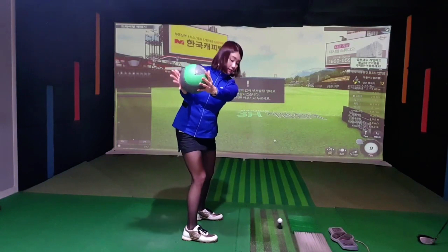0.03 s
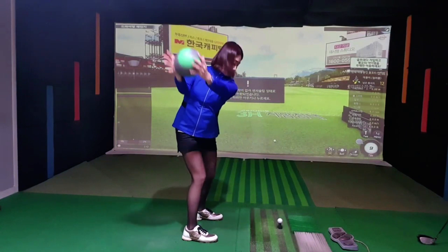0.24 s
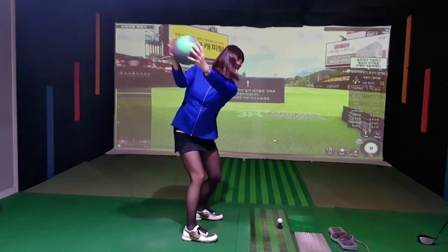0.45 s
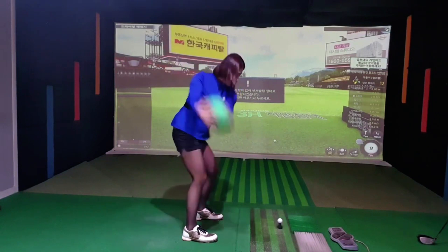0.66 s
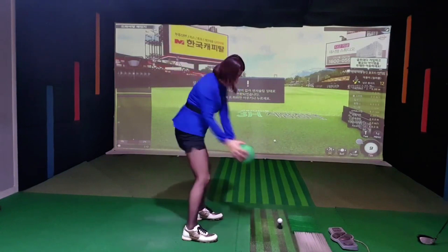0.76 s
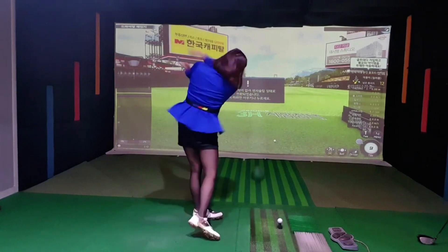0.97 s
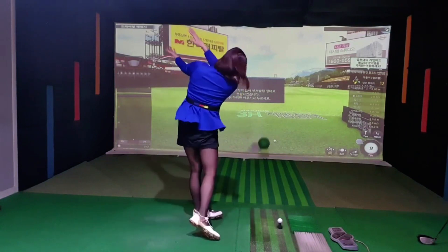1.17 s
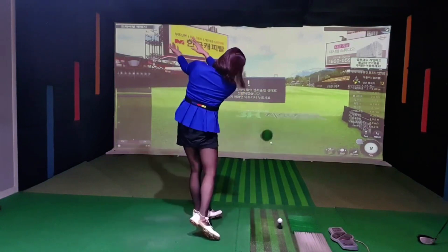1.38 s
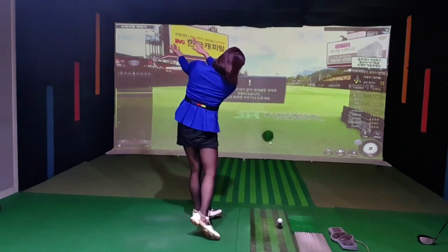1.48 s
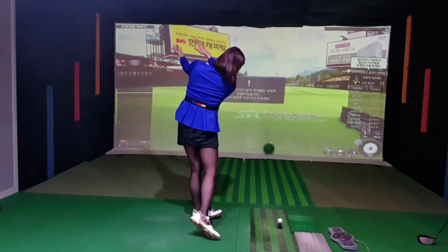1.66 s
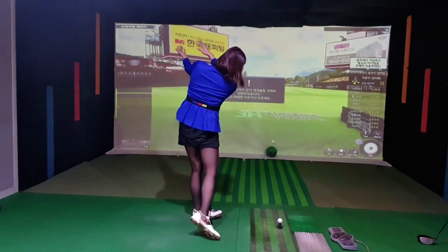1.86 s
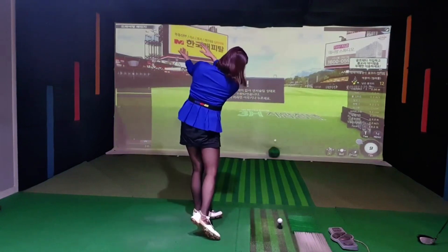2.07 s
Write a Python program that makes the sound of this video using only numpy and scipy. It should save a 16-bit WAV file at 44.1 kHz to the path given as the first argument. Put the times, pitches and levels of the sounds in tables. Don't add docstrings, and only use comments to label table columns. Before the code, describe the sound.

A rubber ball thumps hard on hollow turf flooring, then knocks and scrapes a hanging cloth screen

```python
import sys
import numpy as np
from scipy import signal
from scipy.fft import rfft, irfft, next_fast_len
from scipy.io import wavfile
from scipy.ndimage import uniform_filter1d, map_coordinates

SR = 44100
rng = np.random.default_rng(int(sys.argv[2]) if len(sys.argv) > 2 else 0)


def pcm_store(signal):
    levels = np.round(np.clip(np.atleast_2d(signal), -1, 1) * 32767)
    wavfile.write(sys.argv[1], SR, levels.astype(np.int16).T)


def convert_level_to_amplitude(level_db):
    exponent = np.asarray(level_db, float) / 20
    return 10 ** exponent


N = 93844
THUMP_S, BOARDS_S, REBOUND_S = 1.108, 1.116, 1.215
SWAY_S, SCREEN_S, LAND_S = 1.3, 1.401, 1.853
PAIR = np.array([[1], [-1]])

# [f/Hz, correlation]
LIKENESS = [(60, 0.99), (130, 0.97), (290, 0.96), (640, 0.64), (1400, 0.32), (3100, -0.027), (15000, -0.11)]
# [f/Hz, level/dB per Hz]
HISS_COLOUR = [(2000, -16), (4000, 1), (7000, 1.5), (9500, 4), (10500, -4), (15700, -5.5)]
# [f/Hz, level/dB per Hz]
VENT_COLOUR = [(25, -14.5), (60, -3), (150, -7), (230, -0.5), (450, -8), (1100, -16.5), (2700, -26),
               (3200, -34)]
# [t/s, level/dB]
JACKET_EFFORT = [
    (.4, -72),
    (.65, -76),
    (.8, -64.5),
    (.915, -52),
    (.98, -57),
    (1.02, -56),
    (1.1, -62.5),
    (1.26, -62.5),
    (1.4, -72),
]
# [f/Hz, level/dB per Hz]
NYLON_COLOUR = [(1200, -9.5), (2500, -1.5), (4500, -3), (6700, -7.5), (9500, -5.5), (15600, -7.5)]
# [f/Hz, level/dB per Hz]
ARMS_COLOUR = [(30, -6), (100, 4), (300, -10), (540, 1.5), (750, -17), (2000, -22)]
# [f/Hz, level/dB per Hz]
SLAP_COLOUR = [(60, -4.5), (200, -1.5), (450, -6), (900, -15), (1300, -19.5), (2400, -15), (4500, -26),
               (15600, -39.5)]
# [f/Hz, rise/s]
SLAP_RISE_S = [(100, 0.039), (500, 0.014), (1500, 0.0062), (15000, 0.0044)]
# [f/Hz, hold/s]
SLAP_HOLD = [(200, 0.054), (2500, 0.028), (5000, 0.02), (15000, 0.014)]
# [f/Hz, t60/s]
SLAP_TAIL = [(100, 0.74), (300, 0.37), (1000, 0.38), (3000, 0.23), (8000, 0.2), (15000, 0.29)]
# [f/Hz, level/dB, rise/s, t60/s]
BALL_MODES = [(1135, -39, 0.016, .12), (1336, -43, 0.018, 0.19), (1840, -39, 0.011, 0.12),
              (1946, -63, .015, .12), (2446, -40, 0.028, .12), (2960, -42, 0.036, 0.085),
              (4190, -46, 0.01, .12)]
# [f/Hz, level/dB, rise/s, t60/s]
PLATFORM_MODES = [(44.7, -22, 0.045, 0.43), (87.5, -15, 0.057, 0.091), (137.7, -22.5, 0.039, 0.21),
                  (198.6, -18, .03, 0.112), (223.6, -22.5, 0.059, 0.18), (263.6, -22.5, 0.041, 0.18),
                  (325, -28.5, 0.027, 0.25), (380.7, -27, 0.0474, 0.24), (454, -37, .02, 0.15),
                  (565, -34.5, 0.026, 0.18), (724, -36, .02, 0.28), (861, -40.5, 0.022, 0.28)]
# [f/Hz, level/dB, rise/s, t60/s]
REBOUND_MODES = [(43.1, -30, 0.047, 0.62), (72.3, -24.5, 0.029, 0.24), (158.7, -32, 0.02, 0.23),
                 (203.5, -32, 0.034, 0.32), (274, -34, 0.026, 0.18)]
# [f/Hz, level/dB, rise/s, t60/s]
SWAY_MODES = [(79, -40.5, 0.033, 0.21), (234, -42.5, 0.05, 0.26), (319, -44, 0.044, .15)]
# [f/Hz, level/dB, rise/s, t60/s]
FRAME_MODES = [(210.5, -29.5, .008, 0.1), (232, -29, 0.011, 0.11), (294, -35.5, .006, 0.048),
               (515, -35.5, .008, 0.051), (739, -40, 0.0069, 0.032), (1244, -40, 0.0019, 0.025)]
# [f/Hz, level/dB, rise/s, t60/s]
SHEET_MODES = [(41.4, -32, 0.027, 0.68)]
# [f/Hz, level/dB per Hz]
TAP_COLOUR = [(300, -10), (600, -1), (1300, -3), (2300, -8), (3500, -14), (6000, -36)]
# [f/Hz, level/dB per Hz]
BELLY_COLOUR = [(15, -31), (25, -6), (59, 0.5), (102, -2.5), (135, -16.5), (194, -6.5), (600, -21),
                (780, -46), (1320, -120)]
# [t/s, level/dB]
SCRAPE_EFFORT = [
    (1.402, -51.5),
    (1.42, -40),
    (1.445, -38),
    (1.485, -39.5),
    (1.51, -45),
    (1.54, -43.5),
    (1.6, -48.5),
    (1.66, -61),
]
# [f/Hz, level/dB per Hz]
CLOTH_COLOUR = [(290, -40), (500, -2), (1100, -11), (2200, -6), (4500, -7.5), (8000, -16.5), (12000, -16),
                (15600, -18.5)]
# [t/s, level/dB]
SLIDE_EFFORT = [
    (1.62, -54.5),
    (1.706, -56),
    (1.718, -51),
    (1.87, -47),
    (1.884, -52),
    (2.0, -66.5),
]
# [f/Hz, level/dB per Hz]
SLIDE_COLOUR = [(300, -19), (500, -9.5), (1000, -9), (2000, -9), (3500, -13.5), (6000, -25), (15600, -31)]
# [f/Hz, level/dB, rise/s, t60/s]
LAND_MODES = [(210, -47, .03, .2), (1280, -50, .022, .09), (1650, -47, .012, .06)]
# [f/Hz, level/dB per Hz]
LAND_COLOUR = [(300, -13), (900, -19), (1600, 18), (2400, -7), (3400, -9), (6000, -31)]


def unit(x):
    return x / np.sqrt(np.mean(x ** 2) + 1e-20)


def since(start):
    return np.clip(np.arange(N) / SR - start, 0, None)


def along(points, hz):
    f, value = np.transpose(points)
    return np.interp(np.log(hz + 1), np.log(f + 1), value)


def level(rows):
    s, db = np.transpose(rows)
    return convert_level_to_amplitude(np.interp(np.arange(N) / SR, s, db, left=-140, right=-140))


def turn(hz):
    return np.arccos(np.clip(along(LIKENESS, hz), -1, 1)) / 2


def filtered(x, response):
    m = next_fast_len(N + 8192)
    spectrum = rfft(x, m) * response(np.fft.rfftfreq(m, 1 / SR))
    return irfft(spectrum, m)[..., :N]


def rush(colour, patchy_db, shape=lambda hz, t: 1):
    spread = lambda hz: convert_level_to_amplitude(along(colour, hz)) * [np.cos(turn(hz)), np.sin(turn(hz))]
    mid, side = filtered(rng.standard_normal((2, N)), spread)
    left_right = unit(np.array([mid + side, mid - side]))
    hz, t, z = signal.stft(left_right, SR, nperseg=256)
    patches = uniform_filter1d(rng.standard_normal(z.shape[1:]), size=4, axis=0)
    patches = unit(uniform_filter1d(patches, size=8, axis=1))
    z = z * convert_level_to_amplitude(patchy_db * patches) * shape(hz[:, None], t)
    return signal.istft(z, SR, nperseg=256)[1][:, :N]


def grainy(rate, depth_db):
    knots = rng.standard_normal(int(N * rate / SR) + 4)
    return unit(convert_level_to_amplitude(depth_db * map_coordinates(knots, [np.arange(N) * rate / SR])))


def ring(start, modes, waver_db=0, polarity=1):
    t = since(start)
    out = np.zeros((2, N))
    for (hz, db, rise, t60), sign in zip(modes, rng.choice([-1, 1], len(modes))):
        swell = np.sin(np.pi / 2 * np.minimum(t / rise, 1)) ** 2
        decay = convert_level_to_amplitude(db - 60 * np.maximum(t - rise, 0) / t60)
        waver = grainy(rate=35, depth_db=waver_db)
        tone = np.sin(2 * np.pi * hz * t + sign * turn(hz) * PAIR)
        out += polarity * swell * decay * waver * tone
    return out


def puff(start, colour, db, rise, t60):
    t = since(start)
    envelope = np.minimum(t / rise, 1) * convert_level_to_amplitude(db - 60 * t / t60)
    return envelope * rush([(150, -84)] + colour + [(15000, -50)], patchy_db=2.5)


def microphone_hiss():
    return convert_level_to_amplitude(-74.5) * rush([(500, -58)] + HISS_COLOUR, patchy_db=0)


def ventilation():
    lag_s = 0.000342
    lead = lambda hz: np.exp(1j * np.pi * hz * lag_s * PAIR)
    hum = rush(VENT_COLOUR + [(6000, -45), (16000, -120)], patchy_db=0.77)
    return convert_level_to_amplitude(-48.5) * filtered(hum, lead)


def jacket_rub():
    rub = rush([(400, -78)] + NYLON_COLOUR, patchy_db=1.1)
    return level(JACKET_EFFORT) * grainy(rate=300, depth_db=0.8) * rub


def arm_sweep():
    middle_s, width_s = 0.929, 0.05
    sweep = np.exp(-((np.arange(N) / SR - middle_s) / width_s) ** 2)
    return convert_level_to_amplitude(-46.5) * sweep * rush([(15, -60)] + ARMS_COLOUR + [(6000, -90)], patchy_db=0.5)


def turf_slap():
    def shape(hz, t):
        after = t - THUMP_S
        rise = np.clip(after / along(SLAP_RISE_S, hz) + 0.3, 0, 1)
        dying = np.maximum(after - along(SLAP_HOLD, hz), 0)
        return rise * convert_level_to_amplitude(-60 * dying / along(SLAP_TAIL, hz))

    gate = np.clip(since(THUMP_S) / 0.0015, 0, 1)
    return convert_level_to_amplitude(-26) * gate * rush([(25, -60.5)] + SLAP_COLOUR, patchy_db=1.63, shape=shape)


def ball_ring():
    return ring(THUMP_S, BALL_MODES, waver_db=1.5)


def platform_boom():
    return ring(BOARDS_S, PLATFORM_MODES, waver_db=1) + ring(REBOUND_S, REBOUND_MODES)


def screen_sway():
    return ring(SWAY_S, SWAY_MODES)


def screen_knock():
    frame = ring(SCREEN_S, FRAME_MODES, polarity=-1.03)
    sheet = ring(SCREEN_S, SHEET_MODES)
    return frame + sheet + puff(SCREEN_S, TAP_COLOUR, db=-43, rise=0.0011, t60=0.063)


def cloth_boom():
    t = since(SCREEN_S)
    envelope = np.minimum(t / 0.082, 1) * convert_level_to_amplitude(-37 - 60 * t / 2.3)
    return envelope * rush(BELLY_COLOUR, patchy_db=0)


def cloth_scrape():
    def shape(hz, t):
        delay = 0.016 * np.sqrt(hz / 8100)
        opening = np.clip((t - SCREEN_S - delay) / 0.022 + 1, 0, 1) ** 2
        slowing_db = 43.5 * np.maximum(t - 1.453, 0)
        return opening * convert_level_to_amplitude(-slowing_db * np.log2(1 + hz / 2000))

    rub = rush(CLOTH_COLOUR, patchy_db=1.5, shape=shape)
    return level(SCRAPE_EFFORT) * grainy(rate=350, depth_db=1.2) * rub


def cloth_slide():
    s, db = np.transpose(SLIDE_EFFORT)

    def duller(hz, t):
        under_peak_db = np.interp(t, s, db) - db.max()
        return convert_level_to_amplitude(0.14 * under_peak_db * np.log2(1 + hz / 2000))

    rub = rush([(150, -82)] + SLIDE_COLOUR, patchy_db=0.1, shape=duller)
    return level(SLIDE_EFFORT) * grainy(rate=200, depth_db=1.1) * rub


def landing():
    thud = ring(LAND_S, LAND_MODES, waver_db=1)
    return thud + puff(LAND_S, LAND_COLOUR, db=-42, rise=0.0067, t60=0.14)


def scene():
    room = microphone_hiss() + ventilation()
    throw = jacket_rub() + arm_sweep()
    thump = turf_slap() + ball_ring() + platform_boom()
    screen = screen_sway() + screen_knock() + cloth_boom() + cloth_scrape() + cloth_slide()
    return room + throw + thump + screen + landing()


def top_cut(x):
    return signal.sosfilt(signal.butter(12, 15750, fs=SR, output="sos"), x)


def record(dry):
    mix = filtered(dry, lambda hz: hz < 15700)
    return top_cut(mix)


dry = scene()
out = record(dry)
pcm_store(out)
```